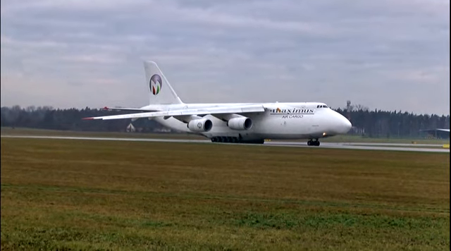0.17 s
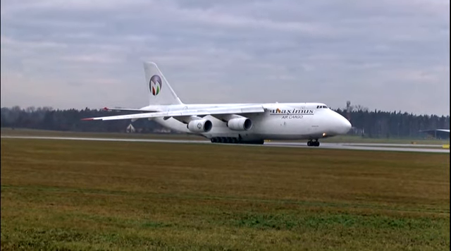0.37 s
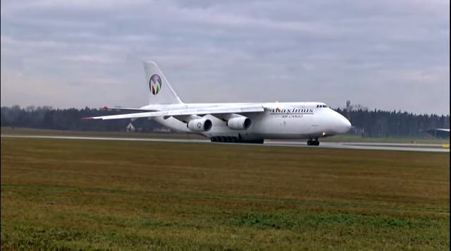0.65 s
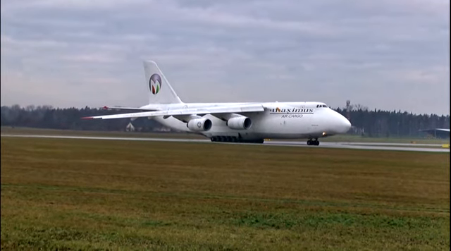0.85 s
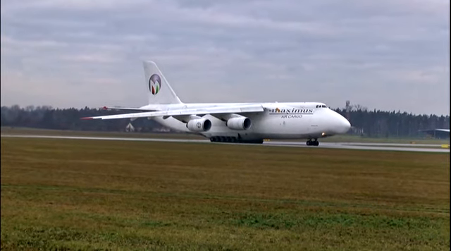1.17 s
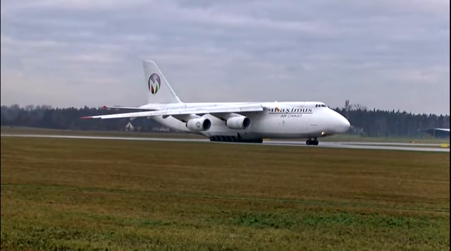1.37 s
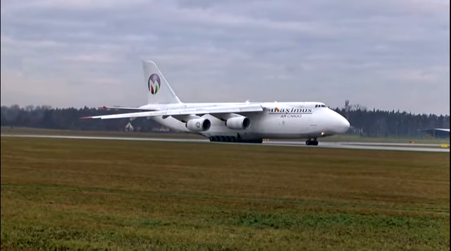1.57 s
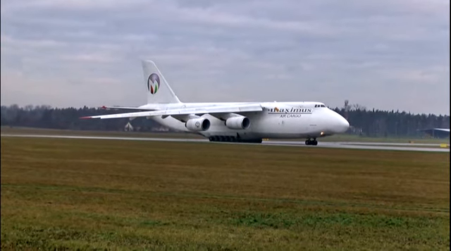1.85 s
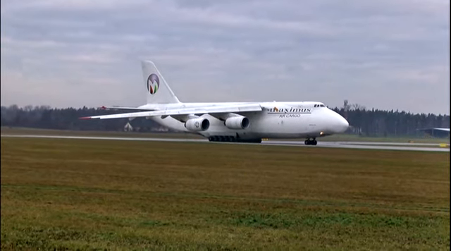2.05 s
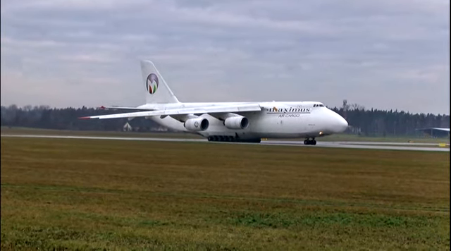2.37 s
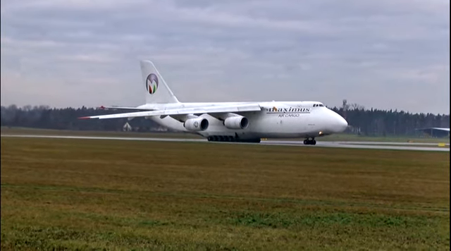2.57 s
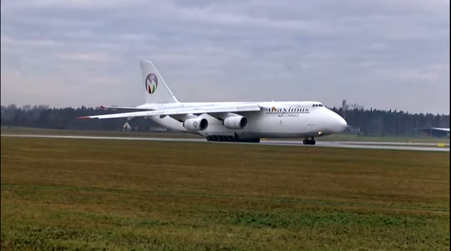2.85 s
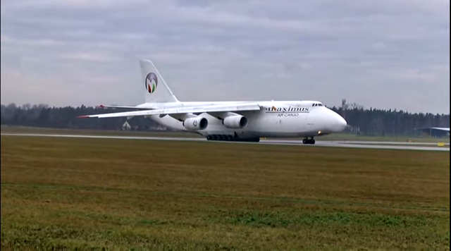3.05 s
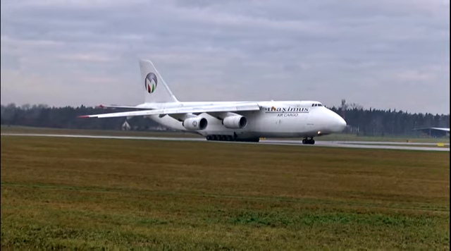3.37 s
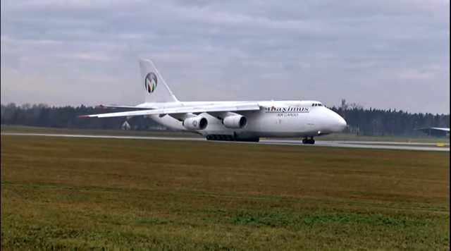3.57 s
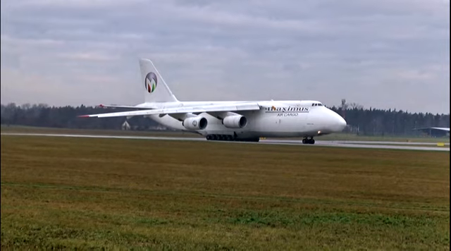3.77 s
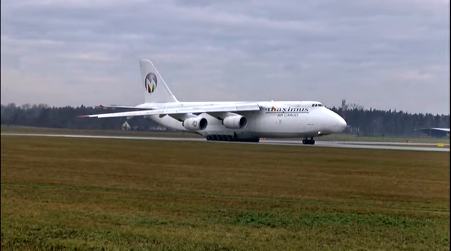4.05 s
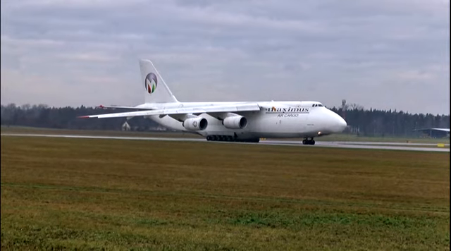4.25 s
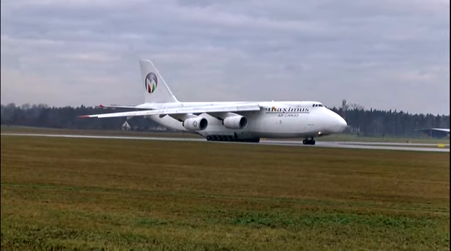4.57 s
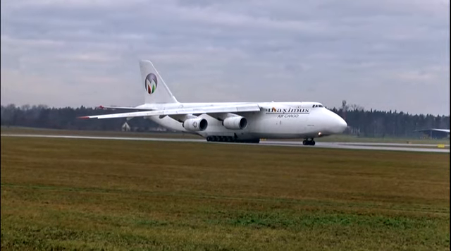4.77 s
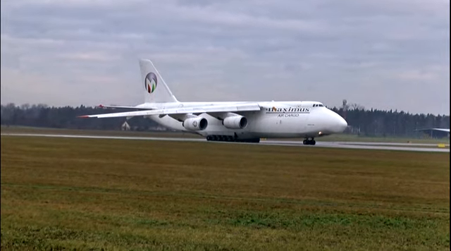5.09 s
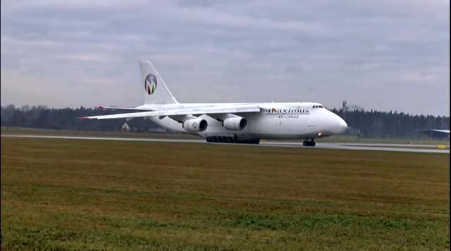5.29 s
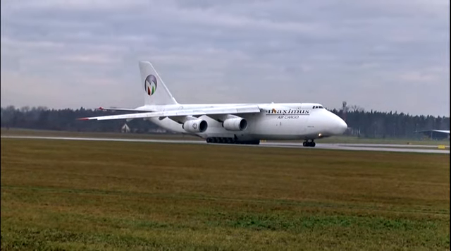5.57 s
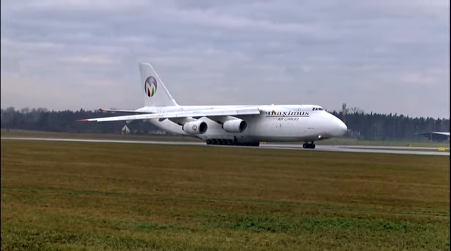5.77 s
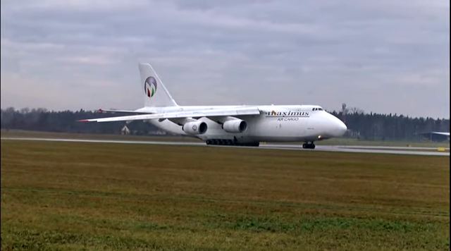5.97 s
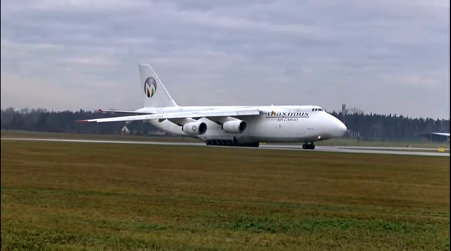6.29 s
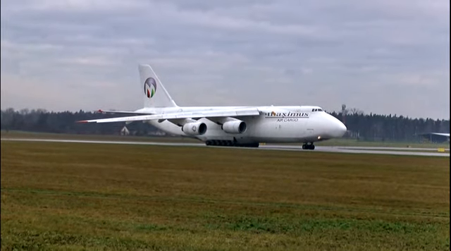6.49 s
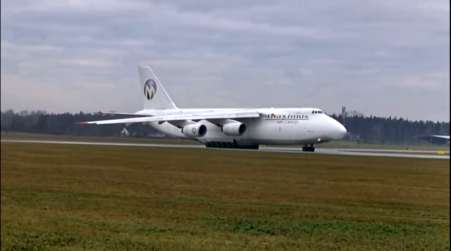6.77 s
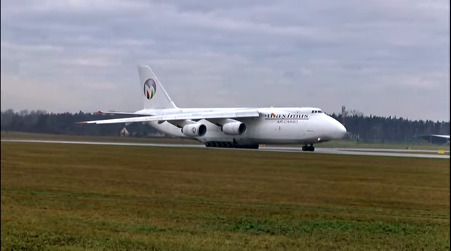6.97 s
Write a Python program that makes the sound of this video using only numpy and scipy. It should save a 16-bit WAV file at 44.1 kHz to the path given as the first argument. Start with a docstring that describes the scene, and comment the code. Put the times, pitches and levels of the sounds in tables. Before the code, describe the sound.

Steady idling jet engines at a distance on an open airfield. Broad rushing noise around one to two and a half kilohertz leads, coloured by blurred, wavering blade tones. Underneath lie a weaker exhaust rumble and surging roar, thin in the low mids; above, a fine hiss rolls off softly. Moving air makes small, quick fluctuations from start to end. The image is narrow and centred, captured by a far stereo microphone.

```python
"""Idling jet freighter

A jet freighter idles on a runway, heard from far across a grass field, nearly in mono.
The exhausts rumble and roar as coloured noise, with low mids swallowed by the soft ground.
The fans rush in broad humps with faint whines, made as noise-modulated tones; the compressors hiss.
Level curves and slow random gains let the moving air make the sound swell and shimmer."""
import sys
import numpy as np
from scipy import signal
from scipy.fft import rfft, irfft, next_fast_len
from scipy.io import wavfile
from scipy.ndimage import uniform_filter1d

SR = 44100
rng = np.random.default_rng(int(sys.argv[2]) if len(sys.argv) > 2 else 0)


def waveform_to_disk(signal):
    """Save audio, clipped to [-1, 1], as 16-bit WAV at the path in sys.argv[1]."""
    frames = np.transpose(np.atleast_2d(signal))
    scaled = np.clip(frames, -1, 1) * 32767
    samples = np.round(scaled).astype(np.int16)
    wavfile.write(sys.argv[1], SR, samples)


N = 314433


def from_db(db):
    """Level law: an amplitude gain is ten to the power of decibels over twenty."""
    return 10 ** (np.asarray(db) / 20)


def rms_one(x):
    """Energy normalisation: scale a signal to unit rms."""
    return x / np.sqrt(np.mean(x ** 2) + 1e-20)


def in_time(rows):
    """Linear interpolation: read each column of a level curve sample by sample."""
    seconds, *columns = np.transpose(rows)
    sample_times = np.arange(N) / SR
    return [np.interp(sample_times, seconds, column) for column in columns]


def at_hz(points, hz):
    """Logarithmic frequency scale: interpolate a spectrum between its points."""
    known_hz, values = np.transpose(points)
    return np.interp(np.log(hz), np.log(known_hz), values)


def bin_hz():
    """Discrete spectrum: the grid of frequencies [Hz] on which noise is coloured."""
    size = 2 * next_fast_len(N // 2 + 1)
    return np.maximum(np.arange(size // 2 + 1) * SR / size, 1)


def noise(gain):
    """Spectral shaping: Gaussian bins weighted by a gain give coloured noise of unit rms."""
    real, imaginary = rng.standard_normal((2, len(gain)))
    return rms_one(irfft(gain * (real + 1j * imaginary))[:N])


def drift(rate_hz):
    """Low-pass random process: slow fluctuation of unit rms."""
    return noise(1 / (1 + (bin_hz() / rate_hz) ** 2))


def steady(x, size=7000):
    """Envelope normalisation: divide out the rms in a moving window of size samples."""
    return x / np.sqrt(uniform_filter1d(x ** 2, size) + 1e-12)


def flow(spectrum, shimmer_db, shimmer_hz):
    """Turbulent flow noise: a band of coloured noise, its level shimmering with eddies on the path."""
    hz = bin_hz()
    below = np.maximum(spectrum[0][0] - hz, 0)
    above = np.maximum(hz - spectrum[-1][0], 0)
    skirt = np.exp(-(below + above) / (.015 * hz))  # steep fall outside the band
    rush = steady(noise(skirt * from_db(at_hz(spectrum, hz))), size=5000)
    return rush * from_db(shimmer_db * drift(shimmer_hz))


# Treble level on top of the overall swell: (time [s], hiss level [dB], sizzle level [dB])
TREBLE_LEVEL = [(0.0, 0.5, -0.8), (0.55, 1.1, -1.5), (1.3, 1, 0.9), (2.1, 1.5, 1.2), (2.5, 0.6, 2),
                (2.8, 0.9, 2.7), (3.1, 0, 0.7), (4.3, -1, 0.2), (4.7, -1.2, -1), (6.05, -0.3, -1.8),
                (6.6, 0.3, -0.5), (7.12, -0.2, -0.3)]


def treble_level():
    """Varying transmission: the level curves [dB] of hiss and sizzle."""
    return in_time(TREBLE_LEVEL)


# Colours of the compressor noise: (frequency [Hz], relative spectral level [dB per Hz])
HISS_SPECTRUM = [(2900, -5), (3130, 0.0), (3600, -2.5), (3770, -6.5), (3920, -6), (4060, -10), (4250, -6.5),
                 (4420, -11.5), (4620, -7), (4950, -8), (5250, -10), (5550, -8.5), (5880, -13.5),
                 (6230, -14.5), (6500, -23)]
SIZZLE_SPECTRUM = [(6500, -7), (6700, -1), (6900, -4.5), (7160, 0.5), (7750, -1.5), (8000, -4),
                   (8350, -6.5), (9000, -14), (9550, -16.0), (9800, -19.5), (10600, -24), (11200, -40.5)]
HISS_DB, SIZZLE_DB = -33.5, -48.5  # dB, before the level curves


def compressors():
    """Flow noise and absorption: fast inner stages hiss; the top is dulled and wanders more in level."""
    hiss_db, sizzle_db = treble_level()
    hiss = flow(HISS_SPECTRUM, shimmer_db=0.5, shimmer_hz=13)
    sizzle = flow(SIZZLE_SPECTRUM, shimmer_db=0.5, shimmer_hz=12)
    return from_db(HISS_DB + hiss_db) * hiss + from_db(SIZZLE_DB + sizzle_db) * sizzle


# Colours of the exhaust noise: (frequency [Hz], relative spectral level [dB per Hz])
RUMBLE_SPECTRUM = [(20, -32), (40, -18), (55, -14), (67, -1.5), (78, -3), (87, 0), (102, 0.5), (125, 0),
                   (150, -2.5), (172, -6), (197, -8), (215, -11), (235, -14.5)]
ROAR_SPECTRUM = [(235, -11.0), (300, -12.5), (400, -15.5), (450, -14.5), (535, -10.5), (570, -7.5),
                 (600, -2.8), (635, 0.3), (705, 0.56), (840, -3), (950, -5.5)]  # dips in the low mids
# Levels on top of the overall swell: (time [s], level [dB])
RUMBLE_LUMPS = [(0.0, -1), (0.22, -2.5), (0.55, -0.2), (0.85, -1), (1.03, -1), (1.25, -0.5), (2.15, -0.8),
                (2.45, 1), (2.62, -3), (2.85, 1), (3.03, -1.7), (3.24, 3.5), (3.42, -2.5), (3.6, 1.2),
                (3.85, -1.1), (4.22, -0.4), (4.38, 3), (4.62, -0.5), (4.86, 0.6), (5.28, 2), (5.52, -0.5),
                (5.85, 2.2), (6.33, -0.7), (6.5, 2), (6.8, 2), (7.12, -0.4)]
ROAR_SURGES = [(0.0, -1.5), (0.55, 0), (1.6, -1.2), (2.2, -0.7), (2.54, 0.5), (2.72, -0.8), (3.1, -0.8),
               (3.8, 1), (4.0, 1.5), (4.2, -0.5), (4.75, 0.5), (5.1, 0.2), (5.35, 1.1), (5.9, 0.6),
               (6.22, 2), (6.38, -0.3), (6.75, 1.7), (7.0, -1.7), (7.12, 1.5)]
RUMBLE_DB, ROAR_DB = -36.1, -34.5  # dB, before the level curves


def exhaust():
    """Jet noise and ground effect: lumpy rumble and surging core roar, notched by the soft ground."""
    lumps_db, = in_time(RUMBLE_LUMPS)
    surge_db, = in_time(ROAR_SURGES)
    rumble = flow(RUMBLE_SPECTRUM, shimmer_db=1.44, shimmer_hz=12)
    roar = flow(ROAR_SPECTRUM, shimmer_db=0.74, shimmer_hz=11)
    return from_db(RUMBLE_DB + lumps_db) * rumble + from_db(ROAR_DB + surge_db) * roar


# Blade tones smeared by turbulence: (centre frequency [Hz], width [Hz], pitch waver [Hz rms],
# level against the fan rush [dB], change with the hiss level [dB per dB])
BLADE_TONES = [(1359, 8.4, 35, -16, 0), (1940, 9.7, 5, -31, 0), (2536, 4, 13.24, -20.3, 3.7),
               (2614, 6, 18, -26.5, 3), (3000, 7, 4, -33, 2), (3070, 3.7, 1.7, -30.5, 0.8),
               (4140, 4, 2, -32.5, 0.8)]
WHINE_FADE_DB, WHINE_FADE_HZ = 1.5, 6  # depth [dB rms] and pace [Hz] of the fading
WHINE_WAVER_HZ = 6  # pace of the pitch waver


def blade_whines(hiss_db):
    """Spectral broadening: rough tones waver and fade independently, most rising with the hiss."""
    whines = 0
    for centre_hz, width_hz, waver_hz, db, follows in BLADE_TONES:
        pitch_hz = centre_hz + waver_hz * drift(WHINE_WAVER_HZ)
        phase = 2 * np.pi * np.cumsum(pitch_hz) / SR
        # independent random weights on cosine and sine widen the line
        tone = steady(drift(width_hz) * np.cos(phase) + drift(width_hz) * np.sin(phase))
        fade_db = WHINE_FADE_DB * drift(WHINE_FADE_HZ)
        whines = whines + from_db(db + follows * hiss_db + fade_db) * tone
    return whines


# Colour of the fan rush: (frequency [Hz], relative spectral level [dB per Hz])
FAN_SPECTRUM = [(950, -10), (1100, -7.0), (1240, -4.5), (1340, -0.9), (1430, -1.5), (1500, -4.0),
                (1600, -5), (1740, -3.5), (2000, -3.5), (2200, -4), (2550, -4), (2650, -4.5), (2760, -10),
                (2900, -15)]
FAN_DB = -25.5  # dB, before the overall swell


def fans():
    """Broadband and tonal fan noise: air rushes through the intakes, with the blades whining in it."""
    hiss_db, _ = treble_level()
    rush = flow(FAN_SPECTRUM, shimmer_db=0.55, shimmer_hz=6.2)
    return from_db(FAN_DB) * (rush + blade_whines(hiss_db))


def eddies():
    """Scintillation: quick eddies on the path shake fans and compressors together."""
    return from_db(0.2 * drift(7))  # 0.2 dB rms, pace 7 Hz


# Overall level, swelling and sinking with the moving air: (time [s], level [dB])
AIR_SWELL = [(0.0, 1.1), (0.18, -0.5), (0.45, 0.3), (0.62, 0), (0.87, -0.6), (1.02, 1.2), (1.25, -0.2),
             (1.5, 0.8), (1.69, -1.1), (1.78, -0.2), (2.17, -0.1), (2.3, 1.1), (2.66, 0.3), (2.69, -1.1),
             (2.86, -1.5), (2.98, 0.2), (3.08, -1.5), (3.26, -1.4), (3.33, -0.3), (3.52, 0.2), (3.58, -0.7),
             (3.9, -0.4), (4.2, 0.8), (4.6, 0.2), (4.86, 1.4), (4.94, -0.5), (5.35, -0.6), (5.5, 0.2),
             (5.72, 0.1), (5.83, -1), (6.02, 0.2), (6.72, 0.1), (6.84, 0.3), (7.12, -0.9)]


def air_swell():
    """Propagation through moving air: one gain curve for the whole sound."""
    swell_db, = in_time(AIR_SWELL)
    return from_db(swell_db)


# Stereo width: (frequency [Hz], side against mid level [dB])
STEREO_WIDTH = [(30, -13.0), (65, -36.5), (125, -42), (220, -21.5), (370, -11.0), (680, -26.5),
                (900, -16.0), (1450, -21.5), (1750, -16.5), (2300, -24.5), (2950, -17.0), (5500, -20),
                (6700, -14), (8800, -22)]
# Stereo lean: (frequency [Hz], left minus right level [dB])
STEREO_LEAN = [(150, 0), (290, 1.5), (440, -1.5), (820, 0.5), (1020, -2.8), (1400, -0.2), (1950, 1.5),
               (2250, 0.2), (2850, 1), (3300, 1.4), (5200, 0.5), (6400, 0), (7000, -1), (8700, -0.5)]


def field(x, diffuse=0.4):
    """Interchannel coherence: two ports hear nearly the same, with a partly diffuse side and a lean."""
    hz = bin_hz()
    direct = rfft(x, 2 * (len(hz) - 1))
    # scatter from ground and trees arrives with random phase
    scatter = np.exp(2j * np.pi * rng.random(len(hz)))
    # a quarter-turn part makes a small phase difference between the ports
    phase = 1j * np.sqrt(1 - diffuse) + np.sqrt(diffuse) * scatter
    side = direct * from_db(at_hz(STEREO_WIDTH, hz)) * phase
    lean = from_db(at_hz(STEREO_LEAN, hz) / 2)
    left = direct * lean + side
    right = direct / lean - side
    return irfft(np.array([left, right]))[:, :N]


def scene():
    """Superposition: the engine sounds add and cross the field through moving air."""
    engines = exhaust() + eddies() * (compressors() + fans())
    return field(air_swell() * engines)


def record(dry):
    """Band limitation: an elliptic low-pass cuts the top steeply."""
    # order 10, 0.1 dB ripple, 80 dB rejection, edge at 11200 Hz
    low_pass = signal.ellip(10, .1, 80, 11200, fs=SR, output="sos")
    return signal.sosfilt(low_pass, dry)


dry = scene()
out = record(dry)
waveform_to_disk(out)
```